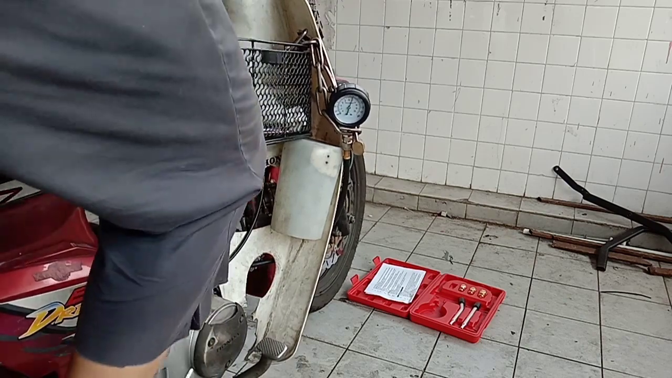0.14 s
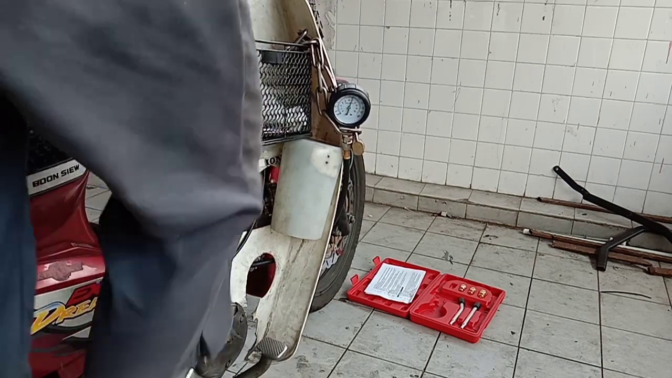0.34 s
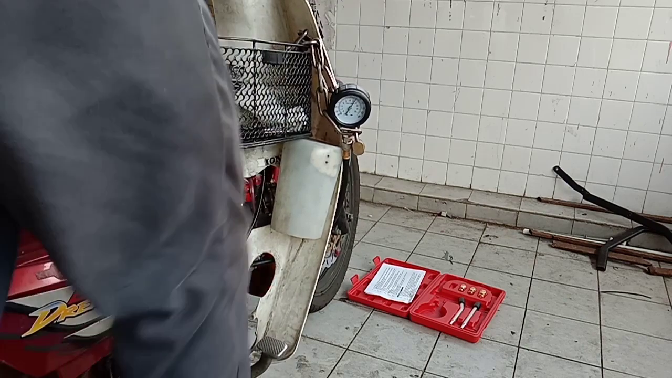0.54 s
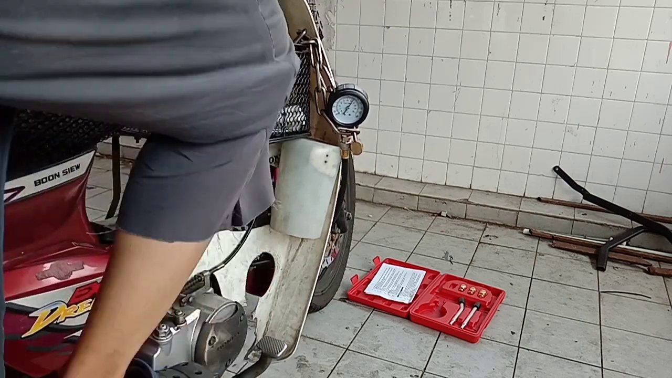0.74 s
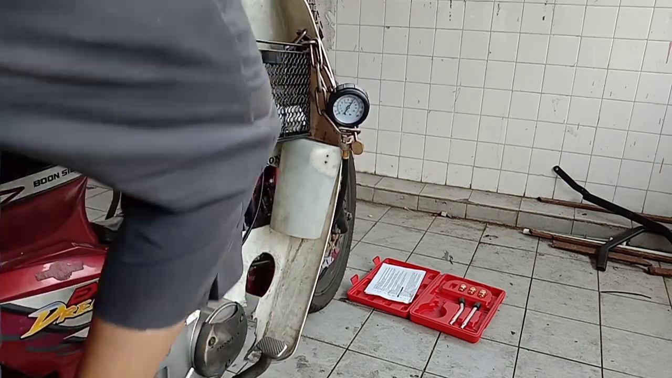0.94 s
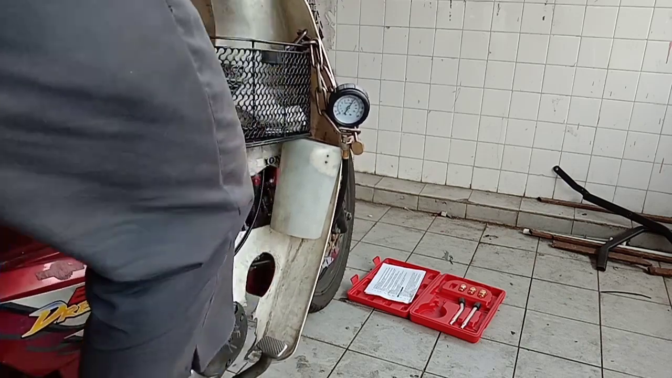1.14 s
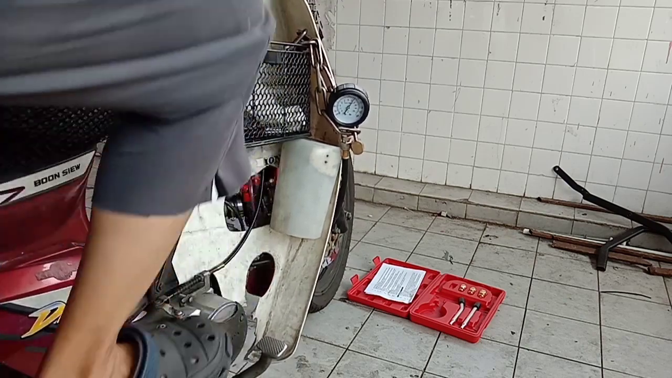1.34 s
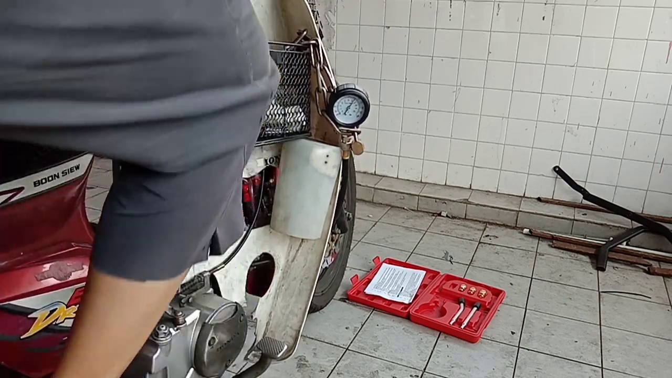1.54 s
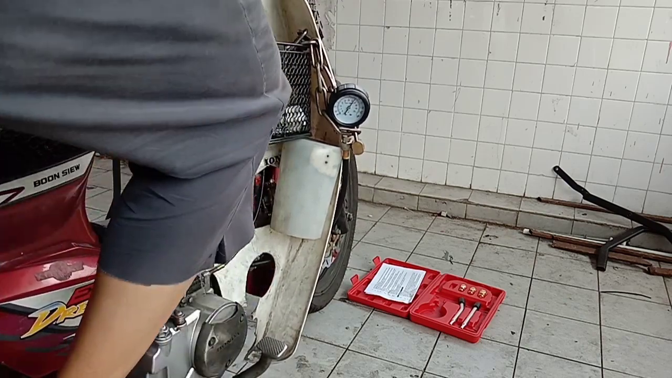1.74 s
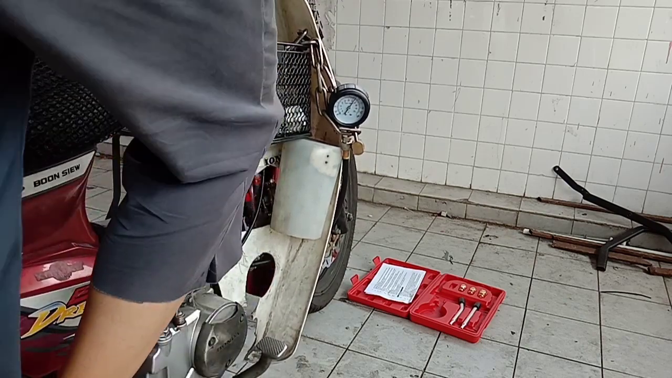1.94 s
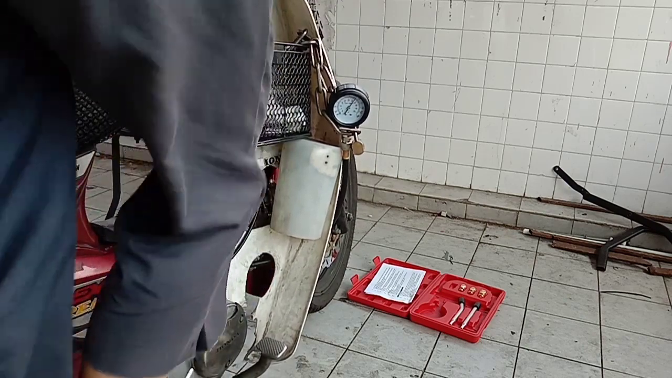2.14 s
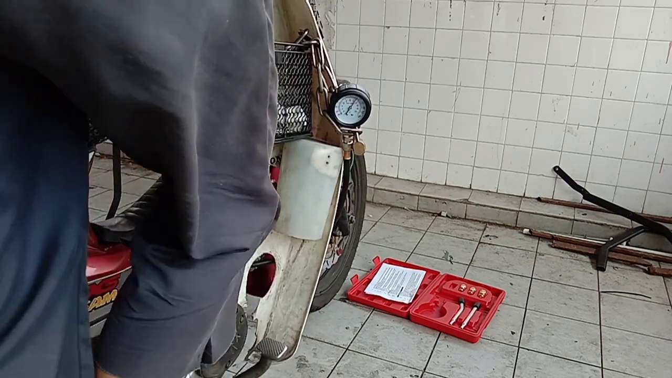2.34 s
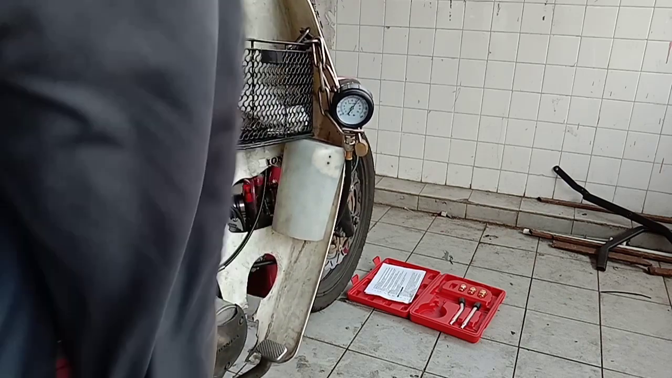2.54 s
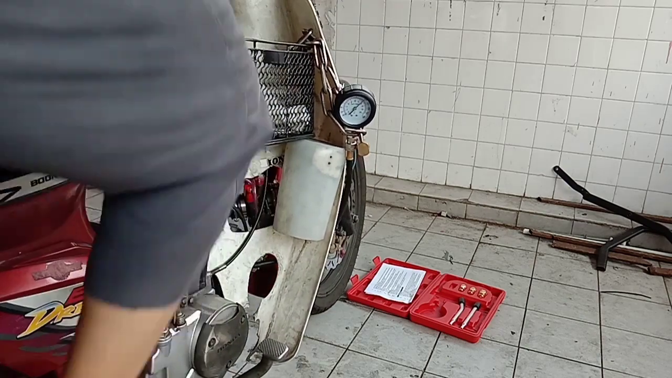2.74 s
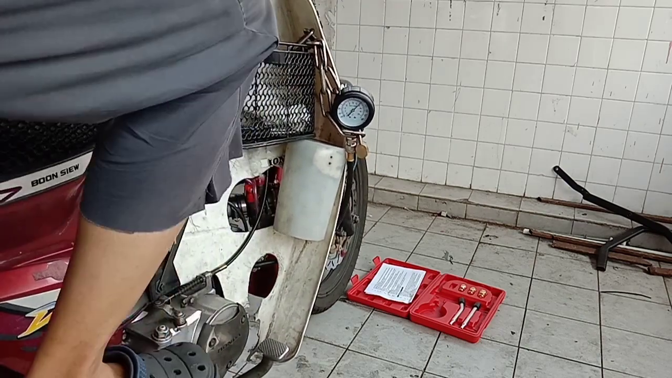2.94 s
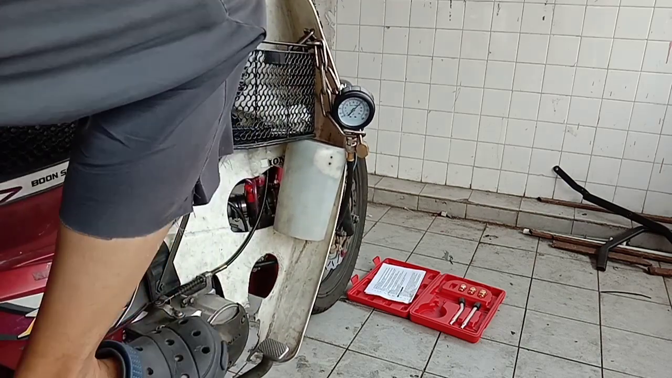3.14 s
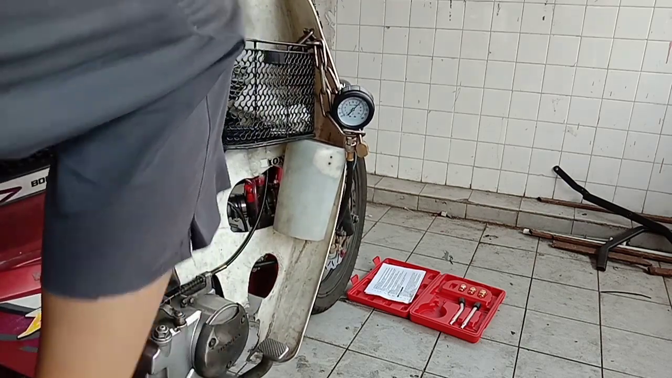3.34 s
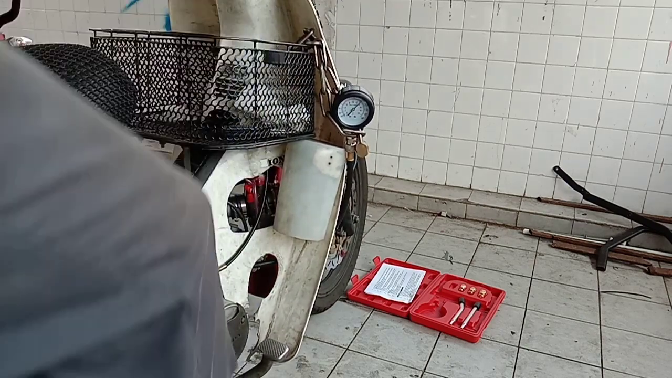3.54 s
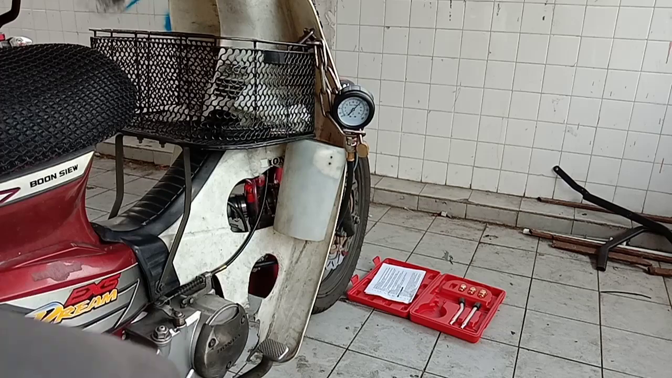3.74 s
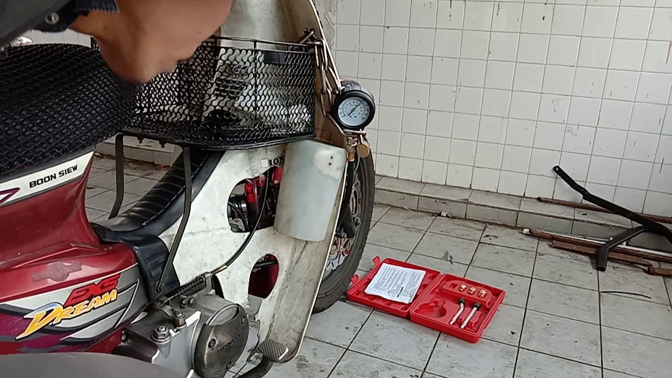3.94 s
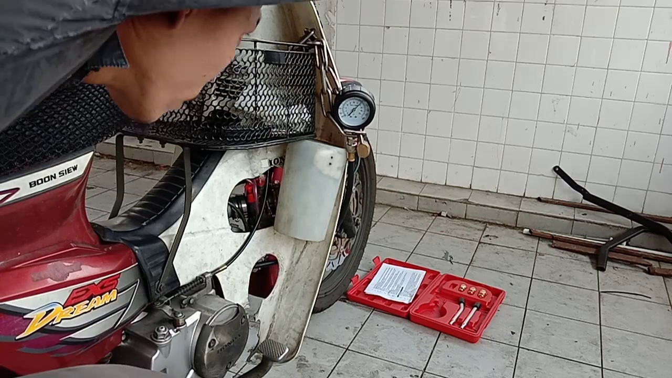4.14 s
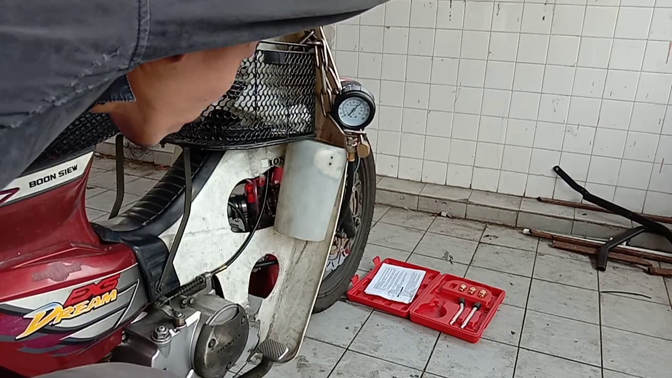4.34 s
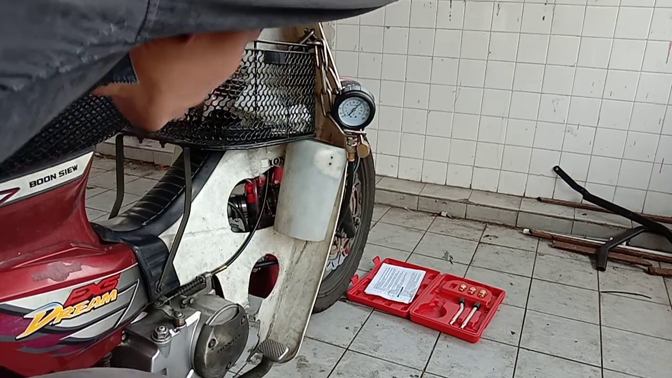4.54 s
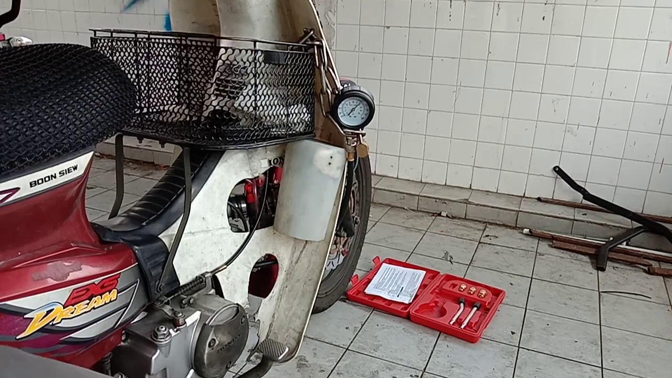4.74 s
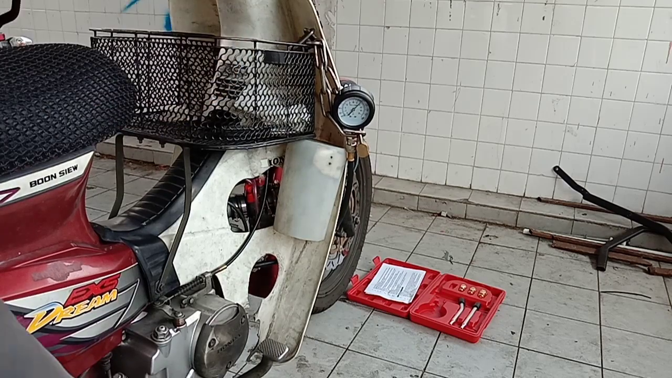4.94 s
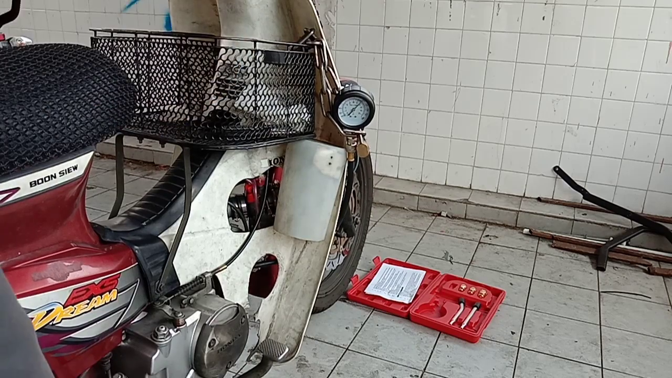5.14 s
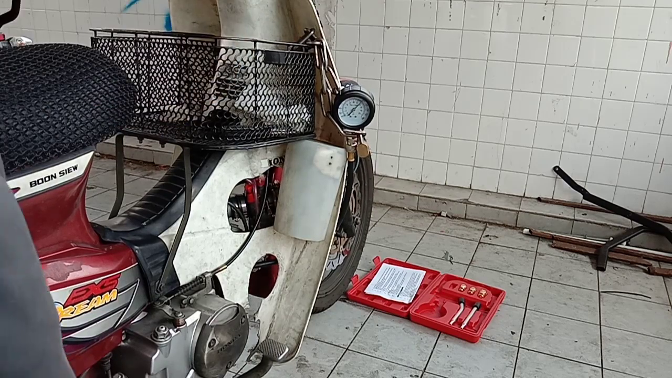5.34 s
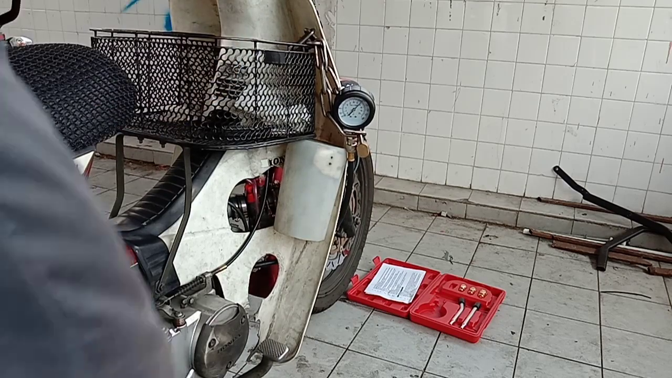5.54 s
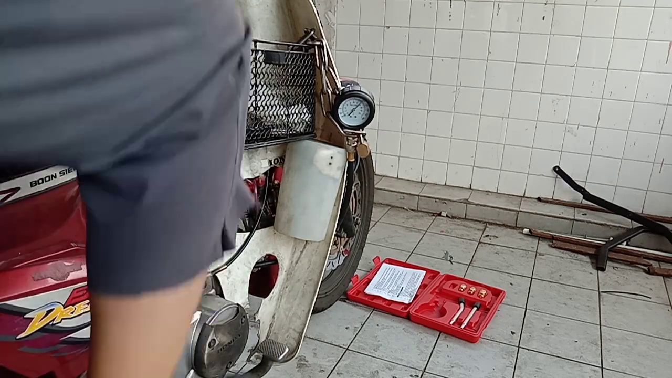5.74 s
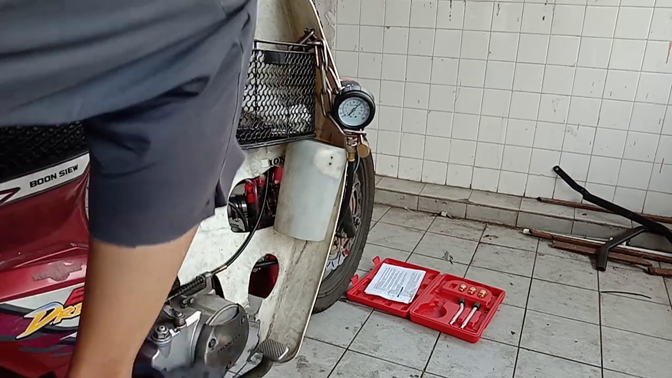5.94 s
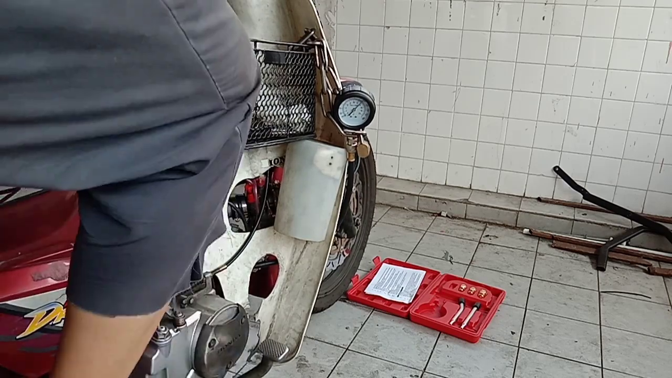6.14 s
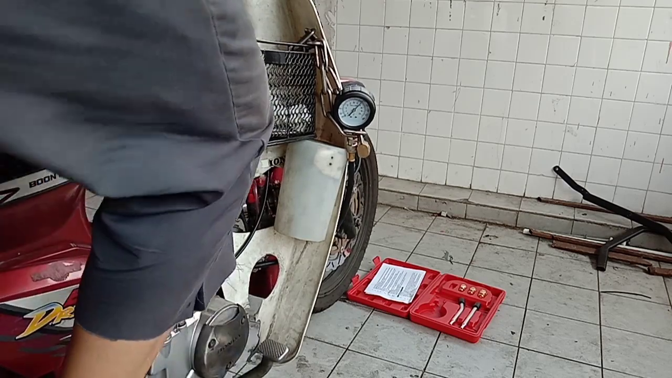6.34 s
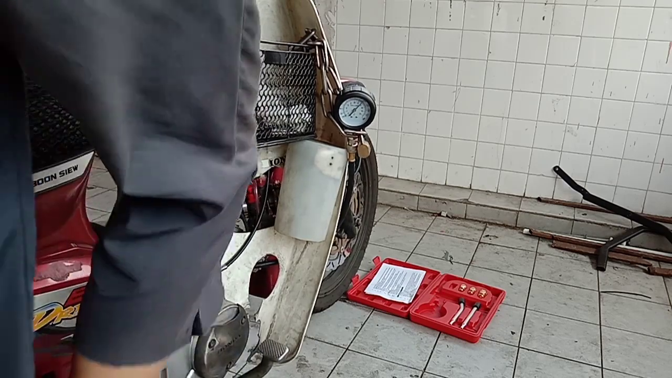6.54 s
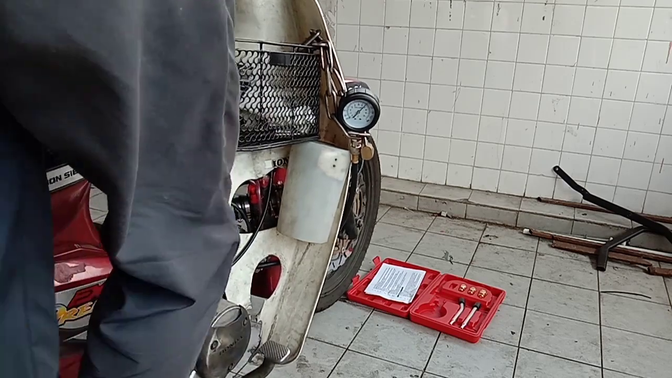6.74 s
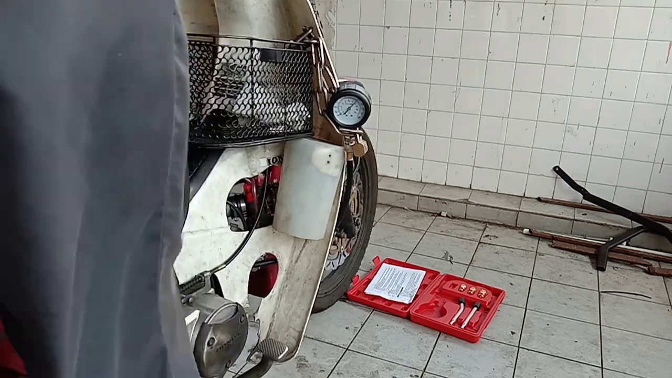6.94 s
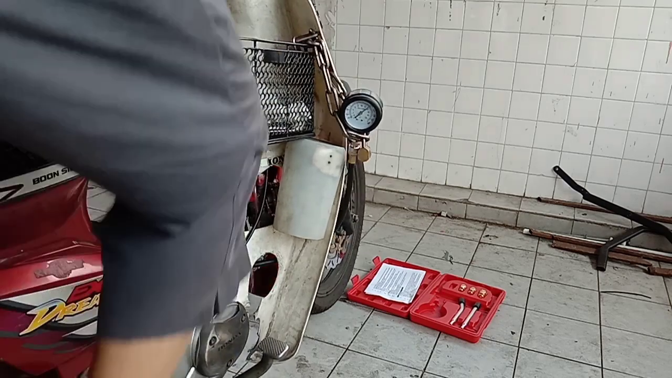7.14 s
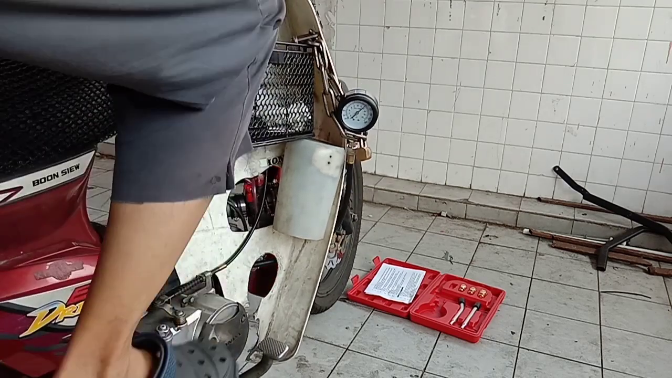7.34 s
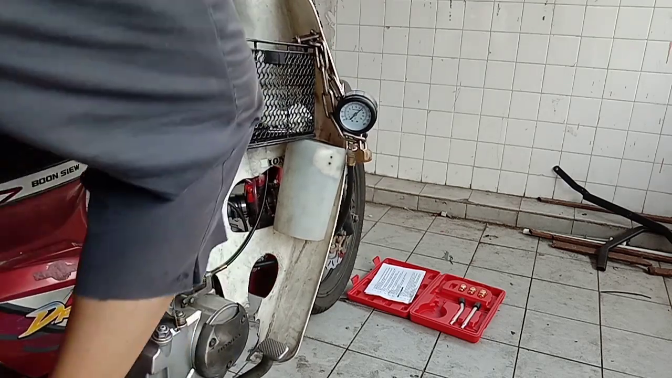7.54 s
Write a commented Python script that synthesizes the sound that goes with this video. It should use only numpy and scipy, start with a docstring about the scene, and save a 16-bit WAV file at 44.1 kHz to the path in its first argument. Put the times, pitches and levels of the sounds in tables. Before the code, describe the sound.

A small motorcycle engine is kicked over three times without starting, chuffing and ticking amid metal knocks, with distant traffic rumbling.

```python
"""A small single-cylinder motorcycle is kicked over three times in a tiled yard and does not fire.
Far traffic rumbles throughout. At 0.4 s the lever knocks, gears and chain rattle, the valves tick and
the exhaust chuffs as the engine coasts to rest. A sandal scuffs, the lever creaks; second kick at 2.5 s.
Fittings rattle through a lull; third kick at 6.8 s, with springs pinging.
The phone that listens adds a resonance of its own."""
import sys
import numpy as np
from scipy import signal
from scipy.fft import rfft, irfft, next_fast_len
from scipy.io import wavfile
from scipy.ndimage import uniform_filter1d, map_coordinates

SR = 44100
rng = np.random.default_rng(int(sys.argv[2]) if len(sys.argv) > 2 else 0)


def inscribe(sig):
    """Save sig as 16-bit PCM at rate SR to the path in sys.argv[1].

    A 1-D sig is mono; a 2-D sig holds one channel per row.
    Samples are clipped to [-1, 1] before scaling.
    """
    pcm = np.round(np.clip(np.atleast_2d(sig).T, -1, 1) * 32767)
    wavfile.write(sys.argv[1], SR, pcm.astype(np.int16))


N = 339081

# Spin-up and coast, one list a kick: t/s, gear level/dB, pipe level/dB, pipe f/Hz
KICK_CURVES = [
    [(.33, -66.5, -81, 87.5), (.4, -43, -62, 87.3), (.45, -30, -48, 86.2), (.49, -32, -26, 87.45),
     (.6, -29, -20, 87.06), (.73, -33.5, -23.5, 87.37), (.79, -37, -30.5, 97.5), (.825, -37.5, -48, 101),
     (.86, -35, -38, 100.9), (.94, -38.5, -35.5, 85), (1.02, -39.5, -43, 82.8), (1.08, -48, -60, 84.44),
     (1.33, -49, -76, 81.8), (1.4, -73, -81, 82)],
    [(2.44, -56.5, -64, 87), (2.52, -33, -18.5, 88), (2.61, -29.5, -20.5, 84.2), (2.7, -29.5, -20.5, 88.3),
     (2.79, -30.5, -24, 87), (2.89, -36.5, -29.5, 86.5), (2.935, -38, -34, 94), (2.97, -34, -29.5, 101.1),
     (3.09, -42, -39.5, 95.7), (3.2, -43, -48, 105), (3.33, -47, -48, 105.2), (3.4, -68, -62.5, 105)],
    [(6.77, -64, -80, 81.4), (6.81, -35, -50, 80), (6.86, -37.5, -19, 82.76), (6.94, -28.5, -22, 83),
     (7.03, -31.5, -24.5, 81.6), (7.15, -37.5, -31, 78.6), (7.3, -40, -42, 77.6), (7.44, -39.5, -40, 73),
     (7.56, -61, -58, 73), (7.68, -81, -75, 74)],
]
# Valves and pawls snapping shut: t/s, level/dB, t60/s
VALVE_TICKS = [(.443, -12.5, 0.064), (.5082, -24, 0.12), (.55, -6.5, 0.045), (.619, -18, .058),
               (.842, -16, 0.058), (.9488, -13.5, 0.038), (1.022, -31, .065), (2.285, -35, .05),
               (2.5322, -30, 0.13), (2.571, -7, 0.037), (2.6652, -8.5, 0.049), (2.7308, -22, 0.1),
               (2.9456, -13.5, 0.049), (3.113, -25, .045), (6.8693, -20, .062), (6.92, -14, .066),
               (7.3418, -21.5, .047)]
# Foot and hand move lever, stand and fittings: t/s, length/s, rattle level/dB, fine rattle level/dB
HANDLING_MOVES = [(0, 0.027, -53, -66.5), (1.365, .29, -44, -60), (2.199, 0.26, -53, -59.5),
                  (3.38, .24, -60.5, -75), (3.671, 0.031, -48, -62), (3.761, 0.44, -53, -65.5),
                  (4.284, .24, -67.5, -89), (5.507, 0.051, -70, -65), (5.603, 0.19, -73, -69),
                  (5.919, 0.15, -49.5, -66), (6.152, 0.29, -61.5, -65), (6.53, .09, -63.5, -71),
                  (6.621, 0.162, -50.5, -54.5)]
# Modes of frame and panels: f/Hz, decay/s
FRAME_MODES = [(280, 0.12), (340, 0.029), (405, 0.095), (520, 0.15), (600, 0.13), (730, 0.053),
               (860, 0.069), (1050, 0.04), (1230, 0.11), (1300, 0.06), (1480, 0.079), (1620, 0.053),
               (1800, 0.072), (2050, 0.064), (2300, 0.045), (2550, 0.08), (2810, 0.062), (3100, 0.039),
               (3500, 0.079), (3900, 0.051)]
# Gear noise spectrum: f/Hz, level/dB
GEAR_SPECTRUM = [(110, -25), (180, -1), (320, -11), (400, -5), (480, -7.5), (780, -8.5), (1270, -10.5),
                 (2000, -16), (3500, -22), (5000, -34), (7000, -67)]
FULL_SPIN_DB = -30  # gear level at full spin


def amp(db):
    return 10 ** (np.asarray(db) / 20)


def unit(x):
    return x / np.sqrt(np.mean(x ** 2) + 1e-20)


def add(track, start_s, sound):
    part = track[max(round(start_s * SR), 0):][:len(sound)]
    part += sound[:len(part)]


def level_at(spectrum, hz):
    """Level/dB of a spectrum, interpolated over log frequency."""
    f, db = np.transpose(spectrum)
    return np.interp(np.log(hz + 1), np.log(f + 1), db, left=-120, right=-120)


def curves(tables):
    """One value per sample for each column after t/s."""
    times_s, *columns = np.transpose(np.concatenate(tables))
    return np.array([np.interp(np.arange(N) / SR, times_s, column) for column in columns])


def filtered(x, response):
    """Apply a complex response of f/Hz."""
    size = next_fast_len(len(x) + SR // 4)
    return irfft(rfft(x, size) * response(np.fft.rfftfreq(size, 1 / SR)), size)[:len(x)]


def modes(rows):
    """Response of resonances of alternating sign: f/Hz, width/Hz, level/dB."""
    return lambda f: sum((-1) ** k * amp(db) * 1j * f * width / (hz * hz - f * f + 1j * f * width)
                         for k, (hz, width, db) in enumerate(rows))


def rattle(spectrum, rate_hz, spread_db):
    """Shaped noise, rms 1, whose level jumps at random."""
    jumps = rng.standard_normal(int(N * rate_hz / SR) + 4)
    level_db = spread_db * map_coordinates(jumps, [np.arange(N) * rate_hz / SR])
    noise = amp(level_db) * rng.standard_normal(N)
    return unit(filtered(noise, lambda f: amp(level_at(spectrum, f))))


def patchy(x, depth_db):
    """Narrow bands swell and fade on their own; rms 1."""
    bands = signal.stft(x, nperseg=512)[2]
    drift = uniform_filter1d(rng.standard_normal(bands.shape), size=2, axis=0)
    drift = unit(uniform_filter1d(drift, size=9, axis=1))
    return unit(signal.istft(bands * amp(depth_db * drift), nperseg=512)[1][:N])


def swells(rows, rise_s=0.013, sag_db_per_s=23.5, fall_s=0.019):
    """Gain that rises, sags and falls for each row: t/s, length/s, level/dB."""
    t = np.arange(N) / SR
    edge = lambda x: np.exp(np.minimum(x, 0))
    return sum(amp(db - sag_db_per_s * np.abs(t - s))
               * edge((t - s) / rise_s) * edge((s + length_s - t) / fall_s) for s, length_s, db in rows)


def after_ticks(offset_db, t60_s):
    """Gain that jumps at each valve tick and decays."""
    gain, t = np.zeros(N), np.arange(SR // 4) / SR
    for s, db, _ in VALVE_TICKS:
        add(gain, s, amp(db + offset_db - 60 * t / t60_s))
    return gain


def spin_gain(full_db, slope):
    """Gain that follows the spin: full_db at full spin, slope in dB per dB of gear level."""
    return amp(full_db + slope * (curves(KICK_CURVES)[0] - FULL_SPIN_DB))


def burst(t60_s, attack_s):
    """Decaying noise: many tiny contacts in one blow."""
    t = np.arange(SR // 4) / SR
    return amp(-60 * t / t60_s) * (1 - np.exp(-t / attack_s)) * rng.standard_normal(len(t))


def yard():
    """Far traffic swells and fades over the quiet air of the yard."""
    # Traffic: t/s, level/dB
    traffic = [(0, -51), (1.2, -44), (1.7, -48.5), (1.85, -44), (2.3, -50), (3.5, -52), (4.2, -43.5),
               (4.48, -42), (4.63, -49), (4.95, -44), (5.4, -43), (5.7, -45), (5.92, -40), (6.05, -51),
               (6.5, -42), (7.6, -38.5), (7.689, -52)]
    # Road rumble: f/Hz, level/dB
    road_spectrum = [(20, -61), (43, -16), (58, -12.5), (82, -1), (105, -6.5), (140, -22.5), (200, -36)]
    # Yard air: f/Hz, level/dB
    air_spectrum = [(25, -32.5), (60, 0), (150, -1), (212, 0.5), (300, -6.5), (700, -27.5), (1250, -21.5),
                    (2900, -27), (6000, -30), (7400, -37.5), (8500, -42.5), (16000, -40.5)]
    rumble = amp(curves([traffic])[0]) * rattle(road_spectrum, rate_hz=15, spread_db=2)
    air = patchy(rattle(air_spectrum, rate_hz=2.91, spread_db=2.5), depth_db=1)
    return rumble + amp(-59) * air


def clatter(rate_hz, spread_db):
    """Loose gear teeth tap the frame at random, rate_hz taps for each mode."""
    out = np.zeros(N)
    for hz, decay_s in FRAME_MODES:
        taps = (rng.random(N) < rate_hz / SR) * amp(spread_db * rng.standard_normal(N))
        radius, angle = amp(-75 / decay_s / SR), 2 * np.pi * hz / SR
        gain = amp(level_at(GEAR_SPECTRUM, hz)) * np.sqrt(hz) * np.sin(angle)
        out += signal.lfilter([gain], [1, -2 * radius * np.cos(angle), radius ** 2], taps)
    return unit(out)


def gears():
    """Gears and loose parts rattle in turns under spin and handling."""
    gain = amp(curves(KICK_CURVES)[0]) + swells(np.array(HANDLING_MOVES)[:, :3])
    noise = patchy(rattle(GEAR_SPECTRUM, rate_hz=60, spread_db=2), depth_db=4.5)
    return gain * unit(noise + amp(-3.5) * clatter(rate_hz=70, spread_db=2.5))


def chain():
    """Fine rattle shaken by spin, ticks and handling; duller when slow."""
    # Chain noise: f/Hz, level/dB
    spectrum = [(2500, -10), (3500, -6), (4700, -7.5), (5600, -2.5), (6300, -19.5), (7000, -5.5),
                (7500, -14.5), (8100, -22), (9600, -14.5), (13500, -31.5), (14300, -36)]
    gain = spin_gain(full_db=-41.5, slope=1.38) + after_ticks(offset_db=-35, t60_s=0.12)
    gain += swells(np.delete(HANDLING_MOVES, 2, axis=1))
    fine = patchy(rattle(spectrum, rate_hz=90, spread_db=1.5), depth_db=5.5)
    treble = filtered(fine, lambda f: f > 7800)
    brightness = np.clip(gain / amp(-62.5), 0, 1) ** 0.5
    return gain * (fine - treble + brightness * treble)


def far_calls():
    """Faint wavering tones, the high ones like birds."""
    # Calls: t/s, length/s, f/Hz, level/dB
    calls = [(.03, .13, 4900, -67), (1.82, .14, 5700, -75), (4.65, .21, 3120, -68), (4.5, .11, 780, -62)]
    out, t = np.zeros(N), np.arange(SR // 2) / SR
    for s, length_s, hz, db in calls:
        waver_rad = np.cumsum(rng.normal(0, 0.07, len(t)))
        envelope = amp(db) * np.sin(np.pi * np.clip(t / length_s, 0, 1))
        add(out, s, envelope * np.sin(2 * np.pi * hz * t + waver_rad))
    return out


def frame_ring(centre_hz, width_oct, damping_s):
    """Frame modes near centre_hz, at new strengths each blow; the foot damps them."""
    t = np.arange(SR // 6) / SR
    hz, decay_s = np.transpose(FRAME_MODES)[:, :, None]
    weight = np.exp(-0.5 * (np.log2(hz / centre_hz) / width_oct) ** 2)
    weight *= amp(rng.normal(0, 1.8, hz.shape))
    partials = weight * amp(-30 * t / decay_s - 35 * t / damping_s) * np.sin(2 * np.pi * hz * t)
    return partials.sum(0) * (1 - np.exp(-t / 0.0017)) / np.linalg.norm(weight)


def dulled(rows, corner_hz):
    """Response of resonances behind a low-pass."""
    return lambda f: modes(rows)(f) / (1 + 1j * f / corner_hz) ** 2 / (1 + (f / (2 * corner_hz)) ** 4)


def knocks(panel_hz=1350):
    """Lever, stand and sandal strike: frame and side panel ring under a clack and a gritty top."""
    # Blows: t/s, clack level/dB, ring level/dB, grit level/dB, ring centre f/Hz, decay/s
    blows = [(0.3832, -52, -36, -39, 350, .06), (.401, -22, -33, -34, 373, 0.15),
             (0.4203, -13.5, -18, -28, 314, 0.045), (.6395, -16, -17, -20, 1020, 0.083),
             (.8689, -21, -29, -18, 420, 0.045), (1.1263, -19.5, -54, -60, 385, 0.016),
             (1.181, -42, -60, -33.5, 400, 0.089), (1.3649, -25, -31, -27.5, 610, 0.13),
             (1.3844, -21, -26, -38, 517, 0.031), (1.443, -28, -58, -31, 614, 0.093),
             (1.4637, -24, -35.5, -23.5, 570, 0.13), (1.4849, -20, -32, -29, 580, 0.14),
             (1.56, -27, -27.5, -36.5, 331, 0.16), (2.1849, -29.5, -30.5, -54, 680, 0.034),
             (2.2107, -35, -40.5, -50, 533, 0.13), (2.316, -54, -56, -41.5, 1790, 0.18),
             (2.472, -18, -31, -27, 675, 0.17), (2.6806, -9.5, -24, -33, 420, 0.052),
             (2.9694, -21, -32, -21.5, 420, 0.089), (3.243, -44, -38, -27, 3140, 0.035),
             (3.295, -35, -34, -55, 420, 0.072), (3.3832, -38, -50, -57, 465, 0.053),
             (3.4392, -42, -60, -43, 425, 0.065), (3.5484, -36, -46.5, -65, 534, 0.053),
             (3.6695, -27, -33, -31, 735, 0.037), (3.7763, -31.5, -41, -31.5, 1660, 0.091),
             (3.8943, -38, -54, -45, 594, 0.078), (3.9764, -48, -41, -41.5, 1750, 0.042),
             (4.0754, -44, -49.5, -43, 1830, 0.061), (5.507, -44, -63, -41.5, 415, 0.1),
             (5.5274, -41, -62, -37, 323, 0.1), (5.5483, -29.5, -49, -36, 280, 0.042),
             (5.7783, -32.5, -34, -23.5, 1640, 0.029), (5.9075, -32.5, -36, -29.5, 1720, 0.053),
             (5.9461, -25.5, -29, -21, 549, 0.073), (5.9802, -23, -33, -29, 616, 0.14),
             (6.0108, -19, -39, -25, 463, 0.11), (6.0794, -30.5, -47, -38.5, 398, 0.12),
             (6.1998, -32, -42, -41.5, 577, 0.25), (6.318, -49, -49, -45.5, 1880, 0.24),
             (6.28, -40, -40.5, -60, 345, 0.07), (6.6271, -18.5, -23, -40, 686, 0.032),
             (6.763, -23.5, -35.5, -50, 600, 0.044), (6.812, -12.5, -27, -18.5, 688, 0.05),
             (7.1432, -15.5, -23.5, -38, 530, 0.028), (7.209, -3.5, -17.5, -13, 555, 0.026),
             (7.2574, -13.5, -11, -45, 477, 0.024), (7.2947, -19, -22.5, -48, 500, 0.061),
             (7.3632, -20, -44, -53, 570, 0.093), (7.4107, -23.5, -16, -24.5, 510, 0.024),
             (7.5312, -20, -38.5, -64, 427, 0.063), (7.591, -40.5, -42.5, -68, 530, 0.063)]
    ring, clack, grit = np.zeros((3, N))
    for s, clack_db, ring_db, grit_db, hz, decay_s in blows:
        add(ring, s, amp(ring_db) * frame_ring(hz, width_oct=0.13, damping_s=0.86 * decay_s))
        add(ring, s, amp(clack_db - 11) * frame_ring(panel_hz, width_oct=0.22, damping_s=decay_s))
        add(clack, s, amp(clack_db) * burst(decay_s, attack_s=0.0024))
        add(grit, s, amp(grit_db) * burst(decay_s, attack_s=0.0032))
    clack = filtered(clack, dulled([(1510, 3700, 0.11), (3040, 3050, -1)], corner_hz=4030))
    grit = filtered(grit, dulled([(3980, 3150, 1.5), (7460, 900, -3.5)], corner_hz=5500))
    return ring + clack + grit


def walls(x):
    """Reverberation off the tiles; treble dies first."""
    # Tail decay: f/Hz, t60/s
    decay = [(200, 0.41), (2000, 0.16), (10000, 0.11)]
    hz, t, bands = signal.stft(rng.standard_normal(SR // 2), SR, nperseg=256)
    t60_s = np.interp(hz, *np.transpose(decay))
    tail = signal.istft(bands * amp(-60 * t / t60_s[:, None]), SR, nperseg=256)[1]
    delayed = np.pad(x, (300, 0))
    return signal.fftconvolve(delayed, tail / np.linalg.norm(tail))[:N]


def high_hiss():
    """A thin hiss near 15 kHz swells with the spin and flares at each tick."""
    # Extra thin hisses: t/s, length/s, level/dB
    hisses = [(.42, .05, -67), (1.565, 0.055, -60), (1.665, 0.032, -66), (2.21, 0.045, -66),
              (2.735, .17, -60), (3.13, 0.066, -63), (5.535, .025, -74), (6.63, 0.11, -62),
              (7.145, .03, -61)]
    gain = spin_gain(full_db=-64, slope=2.4) + after_ticks(offset_db=-47.5, t60_s=0.12) + swells(hisses)
    spectrum = [(13600, -34.5), (14500, -3), (15200, -1), (15800, -15)]  # f/Hz, level/dB
    return gain * rattle(spectrum, rate_hz=40, spread_db=4)


def valves():
    """Each snap rings the cylinder head."""
    # Head modes: f/Hz, width/Hz, level/dB
    head_modes = [(3405, 410, -2), (4530, 1800, -7), (5405, 540, 3), (5960, 90, 5), (6600, 460, -6.5),
                  (9700, 320, -12.5), (11000, 1300, -17.5), (15000, 900, -48)]
    snaps = np.zeros(N)
    for s, db, t60_s in VALVE_TICKS:
        add(snaps, s, amp(db) * burst(t60_s, attack_s=0.0023))
    return filtered(snaps, modes(head_modes))


def exhaust():
    """Each stroke pumps the ringing pipe: a few cycles swell, rise in pitch and break off."""
    # Strokes: peak t/s, level/dB, f/Hz, swell/s
    strokes = [(0.503, -8, 94, 0.016), (0.555, -27, 91, 0.0084), (.609, -11.5, 92, 0.013),
               (0.672, -23, 94.5, .014), (.731, -16.5, 142.5, 0.014), (0.852, -19, 100, 0.0067),
               (0.921, -18.5, 82, 0.013), (1.001, -21, 86, .016), (1.088, -31, 87, 0.012),
               (2.532, -7, 95.6, 0.016), (2.573, -26, 89, 0.0091), (2.617, -12, 92, .014),
               (2.671, -27, 92, .009), (2.728, -10.5, 95, .02), (2.786, -18, 87, 0.013),
               (2.845, -18, 151, 0.0081), (2.891, -24, 101, .012), (2.96, -22.5, 99.5, .0075),
               (2.995, -25, 100, .01), (3.04, -23, 88, 0.022), (3.093, -21, 88, 0.024),
               (6.865, -9.5, 93, 0.02), (6.919, -16, 92, 0.012), (6.967, -13.5, 95, 0.0086),
               (7.009, -13, 98, 0.015), (7.059, -20.5, 99, 0.0098), (7.126, -30, 85, .014),
               (7.472, -26, 88.8, 0.023)]
    # Pipe noise: f/Hz, level/dB
    pipe_spectrum = [(18, -58), (30, -9), (51, -32), (81, 0.5), (170, -9.5), (204, -22.5), (260, -12.5),
                     (340, -31), (570, -120)]
    silencer_spectrum = [(220, -28), (280, -5), (320, -16.5), (400, -2.5), (480, -18.5), (600, -10.5)]
    _, pipe_db, pipe_hz = curves(KICK_CURVES)
    tone = np.sin(2 * np.pi * np.cumsum(pipe_hz) / SR)
    out = amp(pipe_db) * (tone + 0.83 * rattle(pipe_spectrum, rate_hz=15, spread_db=1.5))
    out += amp(pipe_db - 11.5) * rattle(silencer_spectrum, rate_hz=30, spread_db=3.5)
    t = np.arange(-SR // 10, SR // 10) / SR
    for s, db, hz, swell_s in strokes:
        sigma_s = swell_s * np.where(t < 0, 1.04, 0.34)
        envelope = amp(db) * np.exp(-0.5 * (t / sigma_s) ** 2)
        phase = 2 * np.pi * hz * (t + 4 * t * t) + rng.normal(0, 0.26)
        wave = np.cos(phase) + 0.18 * np.cos(2 * phase) + 0.02 * np.cos(3 * phase)
        add(out, s + t[0], envelope * wave)
    return out


def scuffs():
    """Rubber on grit: smooth swells of fine noise."""
    # Sandal drags on tile and pedal: t/s, length/s, level/dB
    drags = [(1.432, 0.05, -70), (2.191, 0.083, -50.5), (5.49, 0.087, -65), (5.934, 0.036, -48),
             (6.608, 0.16, -39)]
    # Sole friction: f/Hz, level/dB
    spectrum = [(180, -48), (300, -32), (446, 0), (910, -7.5), (1350, 1.5), (1740, -3), (2950, -0.5),
                (5010, -7), (5530, 0.5), (8100, -13.5), (9870, -11), (15700, -29)]
    gain = np.zeros(N)
    for s, length_s, db in drags:
        add(gain, s, amp(db) * np.sin(np.linspace(0, np.pi, round(length_s * SR))) ** 1.18)
    return gain * rattle(spectrum, rate_hz=150, spread_db=0.8)


def creaks():
    """The lever rubs on its pivot: friction noise in one resonance a creak."""
    # Rubs: t/s, length/s, f/Hz, width/Hz, level/dB
    rubs = [(2.268, 0.19, 1806, 250, -53), (2.3, 0.2, 2380, 250, -61.5), (3.798, 0.3, 595, 60, -59.5),
            (3.871, 0.18, 1800, 150, -62), (3.895, 0.1, 2390, 150, -64)]
    out = np.zeros(N)
    for s, length_s, hz, width_hz, db in rubs:
        resonance = modes([(hz, width_hz, 0)])
        noise = filtered(rng.standard_normal(round(length_s * SR)), lambda f: resonance(f) ** 2)
        add(out, s, amp(db) * unit(noise) * np.sin(np.linspace(0, np.pi, len(noise))) ** 0.5)
    return out


def springs():
    """Springs ping on single high tones that shiver."""
    # Pings: t/s, f/Hz, level/dB, t60/s
    pings = [(6.885, 6910, -29.5, 0.051), (6.92, 12300, -40, 0.2), (6.92, 11500, -38.5, 0.14),
             (6.92, 8740, -35.5, 0.087), (7.1, 10760, -51.5, .3), (7.1, 13230, -60, .3),
             (7.1, 12480, -58, .4), (7.15, 14710, -49, .2), (7.186, 7100, -39, .04),
             (7.41, 10570, -61, 0.33), (7.4, 11800, -66, 0.29), (7.47, 13250, -67, .2)]
    out, t = np.zeros(N), np.arange(SR // 2) / SR
    for s, hz, db, t60_s in pings:
        shiver_rad = np.cumsum(rng.normal(0, 0.06, len(t)))
        envelope = amp(db - 60 * t / t60_s) * (1 - np.exp(-t / 0.0048))
        add(out, s, envelope * np.sin(2 * np.pi * hz * t + shiver_rad))
    return out


def scene():
    hits = valves() + knocks()
    echo = amp(-9) * walls(hits)
    turning = gears() + chain() + high_hiss() + exhaust()
    return (hits + echo + turning + scuffs() + creaks() + springs() + far_calls() + yard())[None]


def record(dry):
    """The phone's case rings near 1.3 kHz; deep bass is cut, peaks are rounded, the band is limited."""
    bass_hz, top_hz, ceiling = 52, 15780, 0.46
    case = modes([(1278, 39.6, 6.2)])
    high_pass = lambda f: (1j * f / (bass_hz + 1j * f)) ** 2
    x = filtered(dry[0], lambda f: (1 + case(f)) * high_pass(f))
    x = x / (1 + np.abs(x / ceiling) ** 4) ** (1 / 4)
    return filtered(x, lambda f: f < top_hz)[None]


dry = scene()
out = record(dry)
inscribe(out)
```